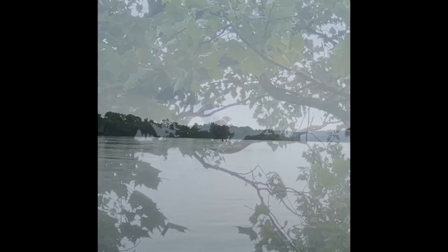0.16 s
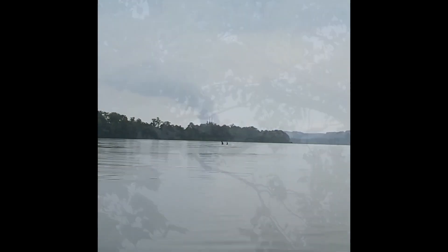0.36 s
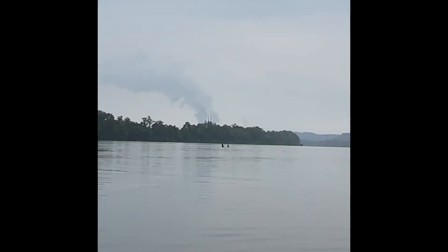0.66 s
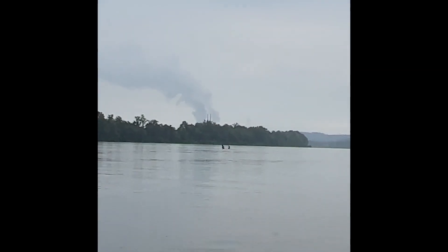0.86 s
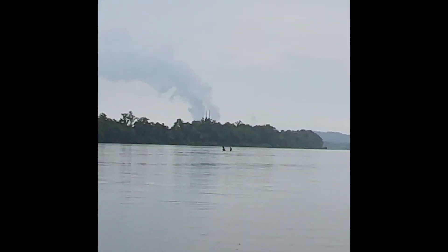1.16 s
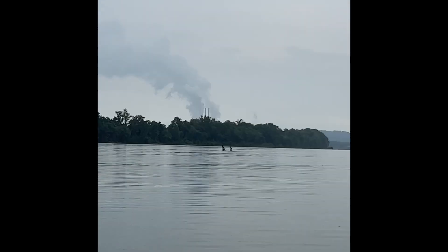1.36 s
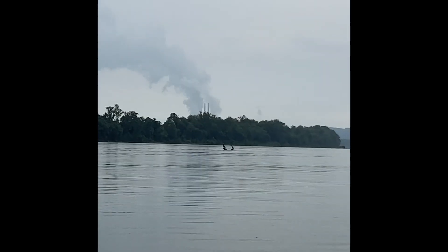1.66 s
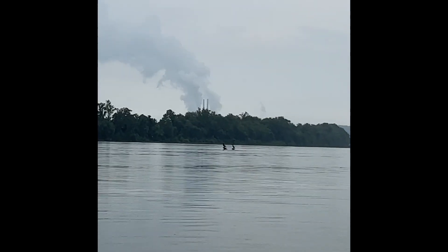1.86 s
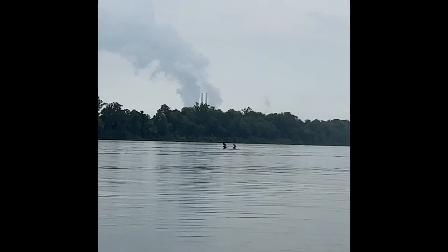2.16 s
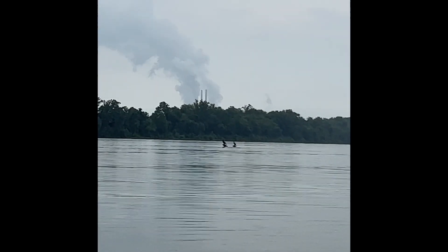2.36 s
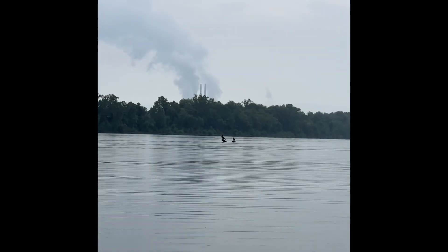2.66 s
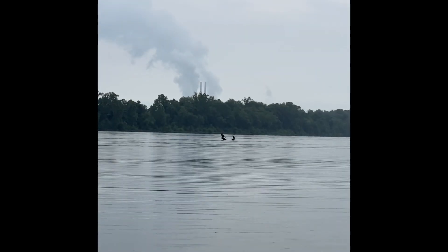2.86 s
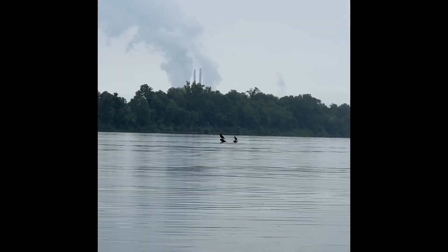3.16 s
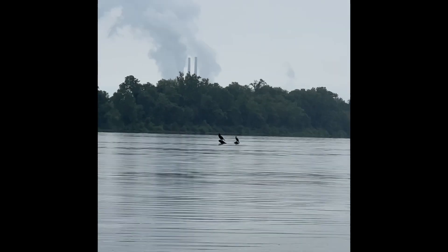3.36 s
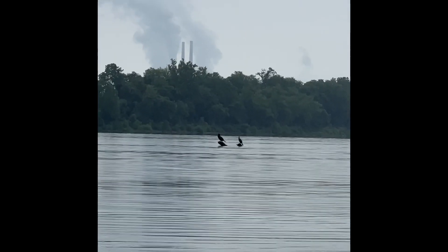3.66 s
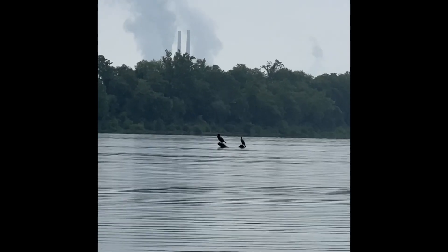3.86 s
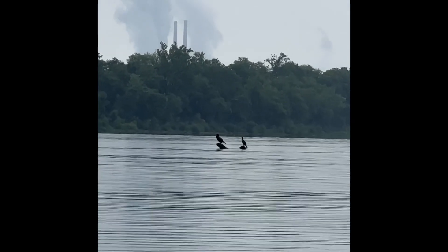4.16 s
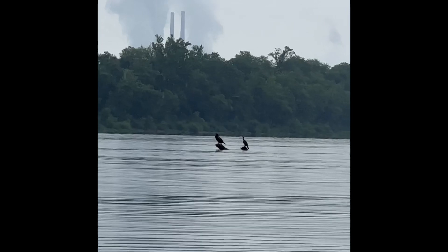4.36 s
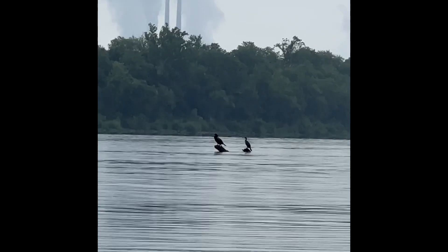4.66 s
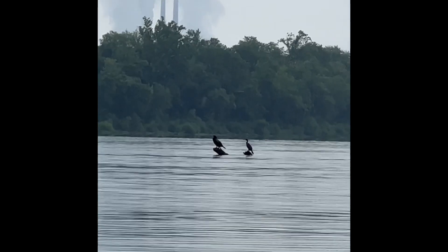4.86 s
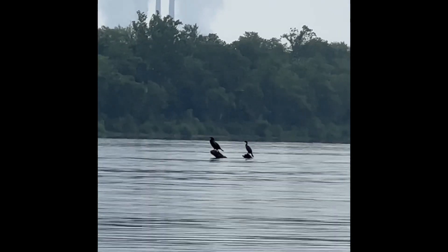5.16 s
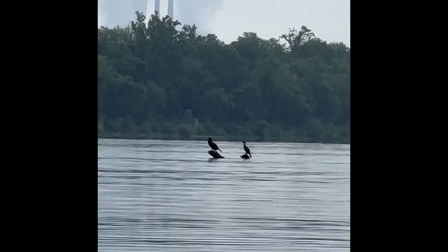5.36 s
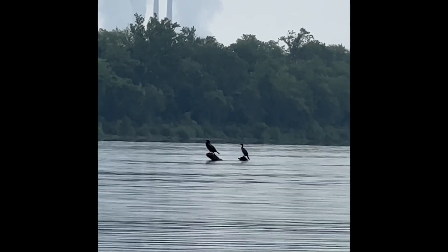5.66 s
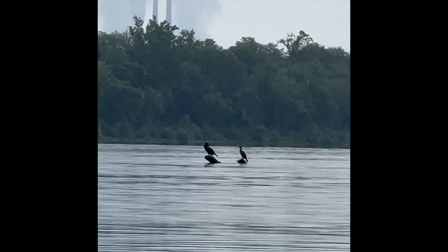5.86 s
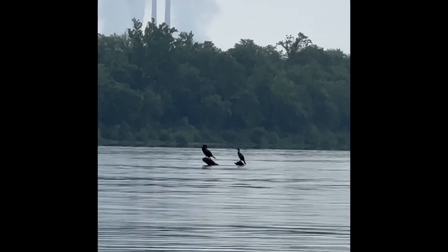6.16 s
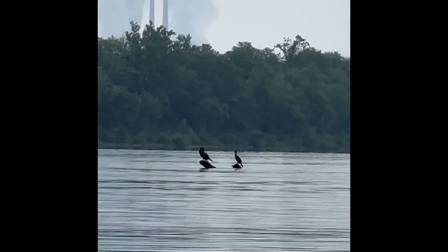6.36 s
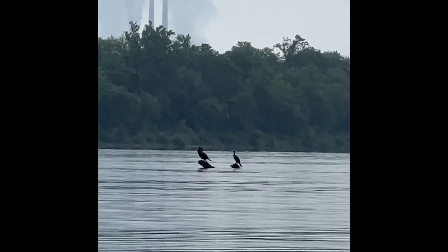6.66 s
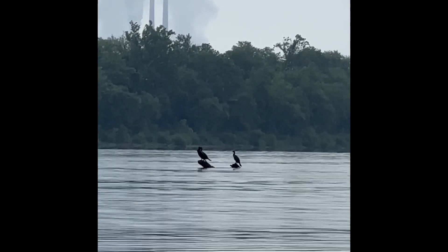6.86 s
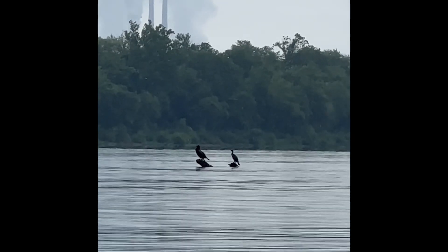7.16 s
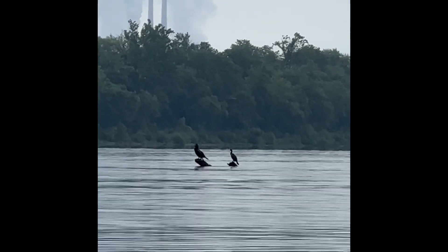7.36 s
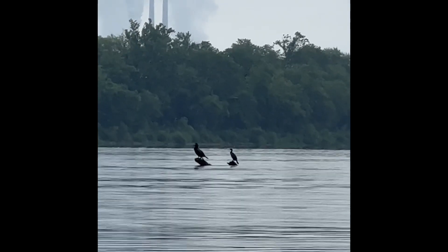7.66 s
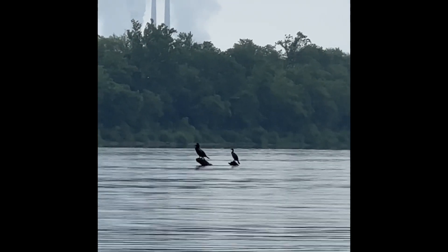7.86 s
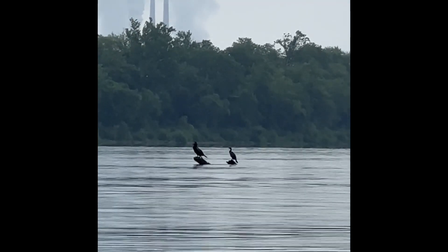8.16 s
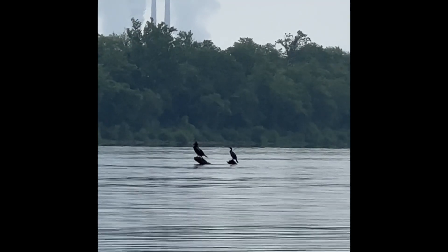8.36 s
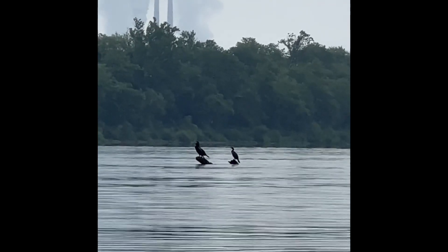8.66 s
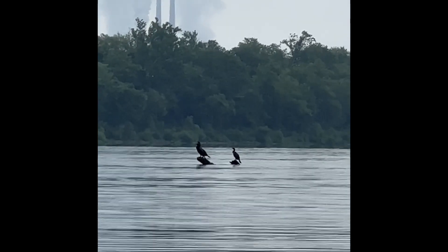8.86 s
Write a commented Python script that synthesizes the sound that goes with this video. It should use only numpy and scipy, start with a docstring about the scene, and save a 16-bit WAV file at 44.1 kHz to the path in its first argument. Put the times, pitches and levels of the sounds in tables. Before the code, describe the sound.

A big diesel throbs far across a calm river with steady low machine hum, while wind softly thumps the microphone and birds whistle and chirp.

```python
"""A wooded bank on a wide, calm river: a big diesel throbs far across the water among steady machine tones.
The engine is harmonic exhaust lines, ringing metal and puffs of noise; roar and hiss are shaped noise.
Light air buffets the microphone with low noise and short thumps; knocks and ticks ring close by.
Leaves rustle briefly. Birds whistle, buzz and sing with gliding sines, and the trees echo them softly."""
import sys
import numpy as np
from scipy import signal
from scipy.fft import rfft, irfft
from scipy.io import wavfile

SR = 44100
rng = np.random.default_rng(int(sys.argv[2]) if len(sys.argv) > 2 else 0)


def transcribe(signal):
    """Save signal, clipped to [-1, 1], as a 16-bit WAV file at the path in sys.argv[1]."""
    frames = np.atleast_2d(signal).T
    limited = np.clip(frames, -1, 1)
    pcm = np.round(limited * 32767).astype(np.int16)
    wavfile.write(sys.argv[1], SR, pcm)


N = 396900
TIME = np.arange(N) / SR
FREQ = np.fft.rfftfreq(N, 1 / SR)

# diesel speed: time_s, working_cycles_per_s
CYCLE_RATE = [(0, 11.11), (1.1, 11.18), (2.3, 11.08), (4.1, 11.04), (5.2, 11.11), (9, 11.06)]
# clear notes of the rocking song: centre_s, length_s, level_db, slide_hz
SONG_NOTES = [(6.309, 0.078, -64.5, 58), (6.44, 0.087, -67.5, -60), (6.577, 0.11, -62.5, -80),
              (6.714, 0.072, -61, -37), (6.847, 0.054, -64, -100), (6.991, 0.046, -66, -25)]


def undb(db):
    """Decibels to gain."""
    return 10 ** (np.asarray(db) / 20)


def unit(x):
    """Scale to rms 1."""
    return x / np.sqrt(np.mean(x ** 2))


def curve(rows):
    """Join (s, value) rows by straight lines."""
    return np.interp(TIME, *np.transpose(rows))


def walk(rate):
    """Random wander of rms 1: straight lines between random knots, rate of them a second."""
    knots = rng.standard_normal(int(TIME[-1] * rate) + 3)
    return unit(np.interp(TIME * rate + rng.random(), np.arange(len(knots)), knots))


def noise(points):
    """Noise with a spectrum of (Hz, dB per Hz) points, falling away beyond both ends."""
    hz, db = np.transpose(points)
    gain = undb(np.interp(np.log(FREQ + 1), np.log(hz), db))
    low_fall = np.minimum(FREQ / hz[0], 1) ** 2
    high_fall = np.minimum(hz[-1] / (FREQ + 1), 1) ** 10
    spectrum = rfft(rng.standard_normal(N)) * gain * low_fall * high_fall
    return irfft(spectrum, N) * np.sqrt(SR / 2)


def ring(x, hz, width_hz):
    """One resonance, gain 1 at its centre."""
    return signal.lfilter(*signal.iirpeak(hz, hz / width_hz, fs=SR), x + 1e-18)


def low_pass(x, hz):
    """Dull a sound gently above hz."""
    return signal.sosfilt(signal.butter(2, hz, fs=SR, output="sos"), x)


def treble(x, hz):
    """What lies above hz, without delay."""
    return signal.sosfiltfilt(signal.butter(6, hz, "high", fs=SR, output="sos"), x + 1e-18)


def swell(centre, length):
    """Smooth hump of height 1, about length s wide."""
    return np.exp(-np.minimum((2 * (TIME - centre) / length) ** 2, 100))


def sine(hz):
    """Tone of rms 1 on a moving pitch."""
    return np.sqrt(2) * np.sin(2 * np.pi * (np.cumsum(hz) / SR + rng.random()))


def patchy(x, depth_db, rate):
    """Let each octave of a sound wander in level on its own."""
    spectrum, octave = rfft(x), np.log2(np.maximum(FREQ, 2 ** 5))
    out = np.zeros(N)
    for k in np.arange(5, 16):
        band = irfft(spectrum * np.maximum(1 - np.abs(octave - k), 0), N)
        out += band * undb(depth_db * walk(rate))
    return out


def add(out, s, sound):
    """Mix a short sound in at time s."""
    start = int(s * SR)
    out[start:start + len(sound)] += sound


def hiss():
    """Thin treble noise whose octaves flicker in the middle and hold steady at the sides; returns mid and side."""
    # hiss common to both ears: pitch_hz, density_db_per_hz
    mid_hiss = [(4000, -140), (5600, -124), (8000, -126), (10000, -131), (11600, -125), (13000, -128),
                (15800, -126)]
    # hiss opposed between the ears: pitch_hz, density_db_per_hz
    side_hiss = [(4000, -140), (5000, -128), (6500, -140), (10000, -132), (11500, -116), (13000, -115),
                 (15500, -109)]
    return patchy(noise(mid_hiss), depth_db=1.0, rate=20), noise(side_hiss)


def roar():
    """Distant low noise whose octaves wander in the middle and hold steady at the sides; returns mid and side."""
    # roar common to both ears, before the far sound's fade: pitch_hz, density_db_per_hz
    mid_roar = [(25, -100), (60, -68), (120, -69.5), (170, -74.5), (260, -76.5), (350, -82), (500, -86.5),
                (700, -91.5), (1050, -93.5), (1400, -100), (1800, -102), (2000, -105.5), (2200, -107.5),
                (3500, -112.8), (4300, -124)]
    # roar opposed between the ears, before the same fade: pitch_hz, density_db_per_hz
    side_roar = [(25, -112), (100, -104), (200, -99.5), (500, -96.5), (900, -101), (1400, -112),
                 (2000, -121), (2600, -138)]
    return patchy(noise(mid_roar), depth_db=1.5, rate=9), noise(side_roar)


def crackle(rate=24, crackle_db=-95, spread_db=5.0, decay_s=0.0019):
    """Very faint ticking: sparse random decays gate a treble noise."""
    force = undb(spread_db * np.clip(rng.standard_normal(N), -2, 1))
    seeds = (rng.random(N) < rate / SR) * force
    bursts = signal.lfilter([1], [1, -np.exp(-1 / (decay_s * SR))], seeds + 1e-18)
    colour = [(2500, 4), (6000, -5.0), (9500, -15), (11500, 10.5), (13000, -1)]  # Hz, relative dB
    return undb(crackle_db) * unit(bursts * noise(colour))


def leaves(level_db=-75, fall_s=0.2):
    """A brief rustle of shaped noise that dies away at the start."""
    # tint of the rustle: pitch_hz, relative_db
    leaf_tint = [(2000, -1), (3200, -1), (4500, 0.5), (6000, -7), (7500, -8)]
    return undb(level_db) * unit(noise(leaf_tint)) * swell(0, 2 * fall_s)


def breeze(calm_db=-53.5, calm_side_db=-90.5, buffet_cycles=2.7, eddy_db=2.0):
    """Gusts swell a low rumble and single eddies thump the microphone; returns mid and side."""
    # tint of the rumble: pitch_hz, relative_db
    rumble_tint = [(18, -34), (30, -15), (45, -3.5), (65, -0.5), (90, 2), (125, -14.5), (220, -22.5),
                   (400, -44)]
    # gusts over the microphone: centre_s, length_s, level_db, port_difference_db
    gust_rows = [(0.678, 0.18, -45, -90), (1.36, 0.64, -44.5, -75), (3.1, 0.4, -50, -86),
                 (4.097, 1.1, -51, -77), (4.87, 0.72, -44, -62), (5.903, 0.45, -55, -60.5),
                 (6.898, 1.14, -49, -66), (8.3, 0.6, -48, -91)]
    # strongest buffets, each a few cycles long: centre_s, pitch_hz, peak_db
    buffet_rows = [(1.105, 56, -36), (1.292, 84.4, -28.5), (3.28, 58, -37), (3.922, 65, -36),
                   (4.09, 61, -35.5), (4.468, 55, -36.5), (4.605, 54, -38), (4.835, 70, -40),
                   (5.05, 67.5, -32)]
    power, side_power = undb(calm_db) ** 2, undb(calm_side_db) ** 2
    for s, length, db, side_db in gust_rows:
        shape = swell(s, length)
        power = power + (undb(db) * shape) ** 2
        side_power = side_power + (undb(side_db) * shape) ** 2
    thumps = np.zeros(N)
    for s, hz, db in buffet_rows:
        wave = np.sin(2 * np.pi * (hz * TIME + rng.random()))
        thumps += undb(db) * swell(s, buffet_cycles / hz) * wave
    mid = unit(noise(rumble_tint)) * np.sqrt(power) + thumps
    side = unit(noise(rumble_tint)) * np.sqrt(side_power) * undb(eddy_db * walk(9.9))
    return mid, side


def tick(hz, width_hz, decay_s, grit):
    """A sharp contact with a short scrape, inside one broad resonance; peak 1."""
    age = TIME[:SR // 20]
    sound = (age == 0) + grit * rng.standard_normal(len(age)) * np.exp(-age / decay_s)
    for _ in range(3):
        sound = ring(sound, hz, width_hz)
    return sound / np.abs(sound).max()


def ticks(scrape_db=-37, scrape_s=0.042, scrape_hz=7000, tick_decay_s=0.0031):
    """Knocks ring a few broad modes and scrape on briefly, duller for a softer contact; fainter ticks ring one."""
    # light close knocks: start_s, level_db, dull_above_hz (softness of the contact)
    knock_rows = [(2.297, -43, 1900), (5.7032, -39, 8500)]
    # what the knocks ring with: pitch_hz, width_hz, relative_db, scrape_decay_s
    mode_rows = [(560, 600, -2, .0035), (1450, 800, -1, .0014), (6500, 4500, -14, .001)]
    # faint close ticks: start_s, peak_db, pitch_hz, width_hz
    tick_rows = [(.254, -61, 5750, 1500), (.526, -65, 3450, 1200), (.839, -66, 11800, 3000),
                 (1.155, -70, 11700, 2500), (1.209, -69, 11500, 2000), (1.248, -68, 11200, 2500),
                 (1.347, -67, 9500, 6000), (1.752, -66, 3300, 1800), (2.311, -68, 11000, 6000),
                 (2.391, -71, 7400, 2000), (2.598, -63, 3180, 1800), (3.358, -70, 12300, 3500),
                 (3.414, -64, 12000, 4500), (3.756, -65, 3700, 1300), (3.828, -67, 4000, 6000),
                 (3.893, -61, 4400, 8000), (4.016, -69, 3800, 1500), (4.236, -66, 9000, 7000),
                 (4.287, -69, 9500, 7000), (4.555, -65, 3300, 1300), (4.659, -64, 3000, 1800),
                 (4.944, -54.5, 2390, 1500), (5.25, -66, 6000, 3000), (5.752, -67, 12500, 2500),
                 (5.939, -60, 7900, 4500), (6.021, -66, 11700, 2500), (6.168, -68, 12000, 4500),
                 (6.84, -70, 12000, 4500), (7.323, -68, 6000, 7000), (7.481, -70, 11700, 2480),
                 (8.059, -71, 11700, 2500), (8.223, -65.5, 11300, 2500)]
    out = np.zeros(N)
    for s, db, dull_hz in knock_rows:
        body = sum(undb(mode_db) * tick(hz, width, decay, grit=0.033) for hz, width, mode_db, decay in mode_rows)
        scrape = unit(ring(rng.standard_normal(len(body)), scrape_hz, scrape_hz / 2))
        body = body + undb(scrape_db) * scrape * np.exp(-TIME[:len(body)] / scrape_s)
        add(out, s, undb(db) * low_pass(body, dull_hz))
    for s, db, hz, width_hz in tick_rows:
        add(out, s, undb(db) * tick(hz, min(width_hz, SR / 3), tick_decay_s, grit=0.17))
    return out


def woods(x, t60=1.1, high_t60=.55, echo_db=-9.5, high_hz=7400, dull_hz=9000):
    """Trunks and leaves scatter a soft, dense echo with separate decay times below and above high_hz."""
    age = TIME[:SR]
    scatter = rng.standard_normal(SR) * (1 - np.exp(-age / 0.013))
    high = treble(scatter, high_hz)
    decay = undb(-60 * age / t60)
    tail = (scatter - high) * decay + high * undb(-60 * age / high_t60)
    tail = low_pass(tail / np.linalg.norm(scatter * decay), dull_hz)
    return undb(echo_db) * signal.fftconvolve(x, tail)[:N]


def chirp(centre, length, hz, slide_hz):
    """One short rounded note that slides through its pitch."""
    along = np.clip((TIME - centre) / length + .5, 0, 1)
    return np.sin(np.pi * along) * sine(hz + slide_hz * (along - .5))


def far_birds(blur_hz=120):
    """Slurred notes from deep in the trees, their pitch blurred on the way."""
    # faint far slurs: centre_s, length_s, pitch_hz, slide_hz, level_db
    slur_rows = [(2.422, .12, 4340, -400, -90), (2.705, .1, 4360, -400, -93), (3.09, 0.084, 3540, 200, -85),
                 (3.22, .08, 4460, -330, -91.5), (3.478, .08, 3650, -130, -82.5),
                 (3.668, 0.11, 3470, -150, -87)]
    blur = blur_hz * walk(1200)
    return sum(undb(db) * chirp(s, length, hz + blur, slide_hz) for s, length, hz, slide_hz, db in slur_rows)


def buzzes(spread_hz=320, uneven=0.2, pulsing=0.35):
    """Raspy calls whose pitch rocks rapidly up and down, loudest on each upward sweep."""
    # buzzy calls: centre_s, length_s, pitch_hz, level_db, chirps_per_s, rasp_hz
    buzz_rows = [(.1, .2, 4280, -87, 150, 200), (5.347, 0.13, 4200, -78.5, 75, 300),
                 (6.07, 0.3, 6650, -78.5, 230, 181), (6.092, 0.2, 6230, -80.5, 210, 180)]
    out = np.zeros(N)
    for s, length, hz, db, rate, rasp_hz in buzz_rows:
        turn = 2 * np.pi * np.cumsum(rate * (1 + uneven * walk(100))) / SR
        pitch = hz + spread_hz * np.sin(turn) + rasp_hz * np.tanh(walk(2500))
        out += undb(db) * unit(1 + pulsing * np.cos(turn)) * chirp(s, length, pitch, 0)
    return out


def lisps(first_s=6.221, pairs_per_s=7.29, length_s=0.038, level_db=-77.5, scatter_db=1.5,
          first_hz=4600, step_hz=-68.5, slide_hz=-450, rasp_hz=300):
    """Raspy falling lisps precede the song's clear notes on an even beat, each lower than the last."""
    out, rasp = np.zeros(N), rasp_hz * np.tanh(walk(1200))
    for k in range(len(SONG_NOTES)):
        along = np.clip((TIME - first_s - k / pairs_per_s) / length_s, 0, 1)
        lisp = sine(first_hz + k * step_hz + slide_hz * along + rasp)
        gain = undb(level_db + scatter_db * rng.standard_normal())
        out += gain * np.interp(along, [0, .3, 1], [0, 1, 0]) * lisp
    return out


def rocking_song(first_hz=3665, sink_hz=27, quaver_hz=9):
    """The clear notes of the song, each centred a little lower than the last."""
    out, quaver = np.zeros(N), quaver_hz * walk(300)
    for k, (s, length, db, slide_hz) in enumerate(SONG_NOTES):
        out += undb(db) * chirp(s, length, first_hz - k * sink_hz + quaver, slide_hz)
    return out


def whistles(quaver=0.0032, fullness=0.66, arch_skew=0.68):
    """Near-pure notes that swell and fade while their pitch glides along an arch."""
    # clear whistles: start_s, length_s, start_hz, end_hz, arch_hz, loudest_level_db, loudest_at_share
    whistle_rows = [(0, 0.045, 3150, 3180, 0, -75, 0.3), (0, .06, 4080, 4130, 2, -81, .4),
                    (0.03, 0.14, 7000, 7120, 19, -73.5, 0.3), (0.032, 0.16, 7320, 7430, 21, -75, 0.3),
                    (.04, .12, 3180, 3190, -1, -79, .4), (0.04, .22, 4350, 4320, 1, -81, .42),
                    (.255, 0.096, 3110, 3080, 0, -82, 0.75), (4.869, 0.2, 2440, 2440, -57, -65.5, 0.35),
                    (5.189, 0.24, 6750, 6850, 49, -67.5, 0.29), (5.358, 0.52, 8430, 8200, 740, -68, 0.62),
                    (5.428, .02, 8740, 5760, 2, -78, .3), (5.591, 0.19, 2418, 2400, -50, -63.5, 0.18),
                    (5.931, 0.068, 6710, 6740, 13, -60, 0.53)]
    out, tremble = np.zeros(N), 1 + quaver * walk(250)
    for s, length, start_hz, end_hz, arch_hz, db, loudest in whistle_rows:
        along = np.clip((TIME - s) / length, 0, 1)
        # a skew below 1 turns the pitch early in the note
        hz = start_hz + (end_hz - start_hz) * along + arch_hz * np.sin(np.pi * along ** arch_skew)
        shape = np.interp(along, [0, min(loudest, 1), 1], [0, 1, 0]) ** fullness
        out += undb(db) * shape * sine(hz * tremble)
    return out


def birds(flutter_db=2.4):
    """Whistles, a song and buzzes, all fluttering a little in level; the leaves smear the raspy sounds most."""
    raspy = lisps() + buzzes()
    smeared = raspy + woods(raspy, t60=.5, echo_db=-3)
    return (whistles() + rocking_song() + smeared) * undb(flutter_db * walk(60))


def drone(hz=510, width_hz=80, level_db=-67, peak_s=1.3, length_s=2.7):
    """Noise in a narrow resonance makes a faint, rough drone that swells and fades in the first seconds."""
    hum = ring(ring(rng.standard_normal(N), hz, width_hz), hz, width_hz)
    return undb(level_db) * unit(hum) * swell(peak_s, length_s)


def machinery(waver_db=1.0, whine_hz=350, whine_start_db=-4.5, whine_end_db=1.0, whine_rise_s=4.6):
    """Nearly steady machine tones waver with the air; those above whine_hz start faint and grow clearer."""
    # machine tones, before the far sound's fade: pitch_hz, level_db
    tone_rows = [(59.7, -65.5), (117.4, -58.5), (202.4, -58.5), (275, -65), (404.8, -64), (417, -71.5),
                 (437.3, -78.5), (652, -81.5)]
    whine = np.interp(TIME, [0, whine_rise_s], [whine_start_db, whine_end_db])
    out = np.zeros(N)
    for hz, db in tone_rows:
        level = db + (hz > whine_hz) * whine + waver_db * walk(3)
        out += undb(level) * sine(hz + 0.13 * walk(2.044))
    return out


def gas_puffs(cycles, hz=1150, width_hz=1100, decay_s=0.014, rise_s=.002):
    """A puff of exhaust noise follows each of four firings a cycle, in a broad resonance; rms 1."""
    firings, first_at = 4, .02  # per cycle; share of the cycle
    since_s = (firings * (cycles - first_at)) % 1 / firings / curve(CYCLE_RATE)
    puffs = rng.standard_normal(N) * (1 - np.exp(-since_s / rise_s)) * np.exp(-since_s / decay_s)
    return unit(ring(ring(puffs, hz, width_hz), hz, width_hz))


def clatter(cycles, slap_s=0.00049, scatter_db=1.3, rise_s=0.0037, gas_db=-72.5):
    """Loose metal parts are struck near fixed points of each cycle and ring, amid puffs of exhaust gas."""
    # engine load on the clatter: time_s, relative_db
    load_rows = [(0, 2), (1.9, -3), (3, 1), (4.8, 3), (5.8, 0.7), (9, -0.5)]
    # parts struck once a cycle: cycle_share, pitch_hz, decay_s, level_db, in_bouts (1 yes, 0 follows load)
    clank_rows = [(.545, 1205, .02, -65, 1), (.02, 1200, 0.0054, -67.5, 0), (.55, 901, .024, -63.5, 0),
                  (.32, 905, .014, -69, 0), (.78, 915, .02, -69.5, 0), (.55, 1800, .008, -74, 0),
                  (.3, 470, 0.0065, -63.5, 0)]
    # bouts of louder clanking: centre_s, length_s, added_db (power relative to the usual)
    bout_rows = [(0.327, .15, 8), (.68, .25, 2.5), (1.22, .12, 4), (3.2, .14, 0), (4.1, 1, 1),
                 (4.89, .2, 9.5), (5.35, 0.19, 11), (5.62, 0.22, 6), (5.83, .1, 9), (6.577, .2, 6),
                 (7.18, .1, 9), (7.5, .2, 4.5)]
    out, load = np.zeros(N), undb(curve(load_rows))
    bouts = np.sqrt(1 + sum((undb(db) * swell(s, length)) ** 2 for s, length, db in bout_rows))
    age = TIME[:SR // 4]
    for point, hz, decay_s, db, in_bouts in clank_rows:
        struck = np.flatnonzero(np.diff(np.floor(cycles - point)))
        late, force = rng.standard_normal((len(struck), 2)).T
        blows = np.zeros(N)
        when = np.clip(struck + (slap_s * SR * late).astype(int), 0, N - 1)
        blows[when] = undb(db + scatter_db * force)
        shape = (1 - np.exp(-age / rise_s)) * np.exp(-age / decay_s)
        clank = shape / shape.max() * np.sin(2 * np.pi * hz * age)
        out += signal.fftconvolve(blows * (bouts if in_bouts > .5 else load), clank)[:N]
    return out + load * undb(gas_db) * gas_puffs(cycles)


def exhaust(cycles, waver_db=0.6, uneven_rad=0.0026, smear_turns=.135):
    """Lines of the diesel's cycle; the long path smears the pulses into an even drone and lets each line waver."""
    # exhaust lines, before the far sound's fade: cycle_rate_multiple, level_db
    line_rows = [(4, -66), (6, -63.5), (7, -58.5), (8, -51.5), (9, -66), (10, -69), (11, -64), (12, -45),
                 (13, -58), (14, -55.5), (15, -52.5), (16, -53.5), (17, -49.5), (18, -62.5), (19, -63),
                 (20, -60.5), (21, -59), (24, -64.5), (25, -63), (26, -73), (27, -77.5), (28, -69.5),
                 (29, -71.5), (30, -77), (39, -76.5)]
    # firings come a little early or late
    turn = 2 * np.pi * cycles + uneven_rad * walk(30)
    out = np.zeros(N)
    for k, db in line_rows:
        # dispersion: a line's phase lags by the square of its multiple
        lag = 2 * np.pi * smear_turns * round(k) ** 2
        out += np.sqrt(2) * undb(db + waver_db * walk(4)) * np.sin(round(k) * turn - lag)
    return out


def scene():
    """The far engine and the birds lie ahead; roar, breeze, hiss and echo spread to the sides."""
    cycles = np.cumsum(curve(CYCLE_RATE)) / SR
    # the far sound fades up by 5 dB at first, then holds
    carry = undb(-1.0 - 5 * np.exp(-TIME / 0.24))
    roar_mid, roar_side = roar()
    hiss_mid, hiss_side = hiss()
    wind, wind_side = breeze()
    song, slurs, taps = birds(), far_birds(), ticks()
    far = exhaust(cycles) + clatter(cycles) + machinery() + drone() + roar_mid
    near = wind + leaves() + taps + crackle()
    mid = carry * far + near + song + slurs + woods(song + slurs) + hiss_mid
    # close sounds reach the two microphone ports differently
    near_side = wind_side + undb(-11) * signal.hilbert(taps).imag + undb(-5) * leaves()
    # the shortest waves differ most in phase between the ports, so the highest whistle sounds wide
    song_side = undb(-5) * signal.hilbert(treble(song, 7300)).imag + undb(-26) * woods(song)
    side = carry * roar_side + near_side + song_side + hiss_side
    return np.array([mid + side, mid - side])


def record(dry, top_hz=15830):
    """A steep low-pass cuts the top."""
    return signal.sosfilt(signal.ellip(10, .2, 70, top_hz, fs=SR, output="sos"), dry)


dry = scene()
out = record(dry)
transcribe(out)
```